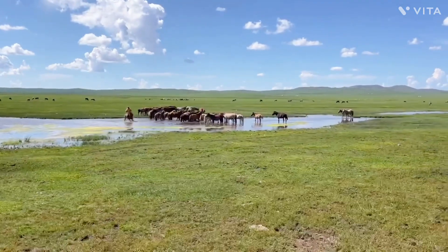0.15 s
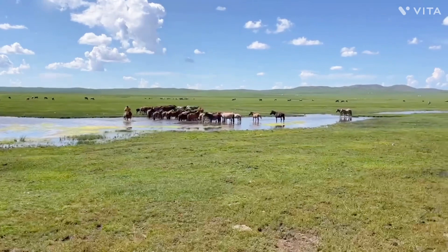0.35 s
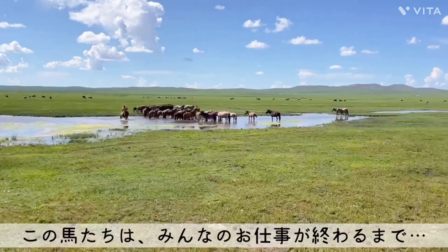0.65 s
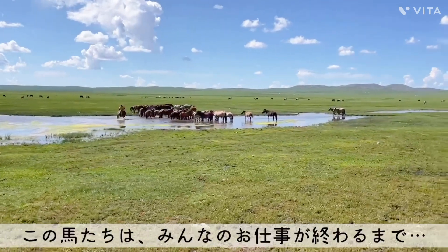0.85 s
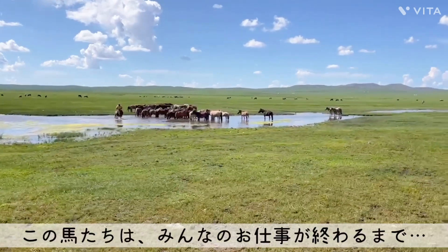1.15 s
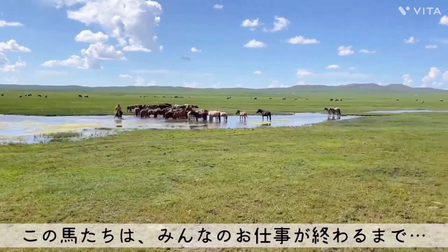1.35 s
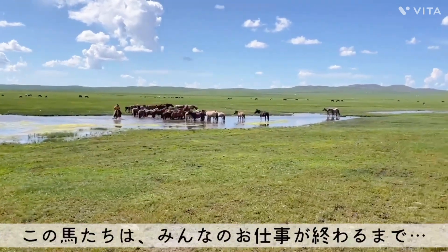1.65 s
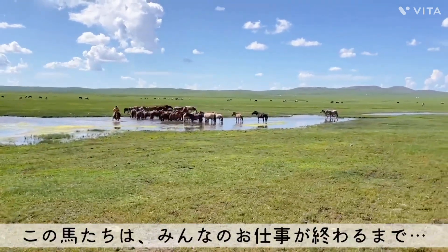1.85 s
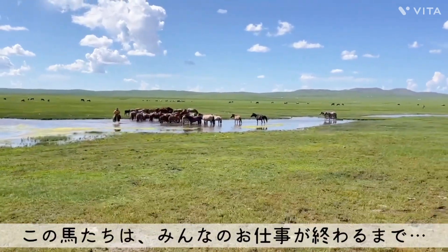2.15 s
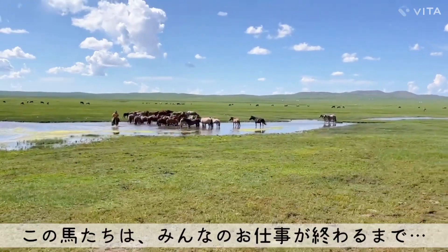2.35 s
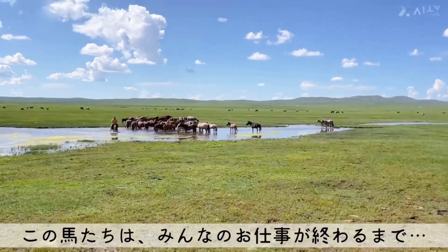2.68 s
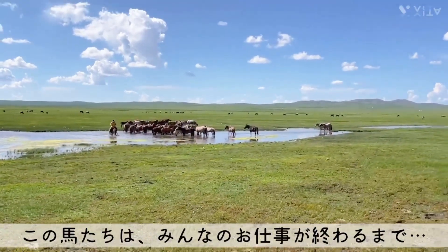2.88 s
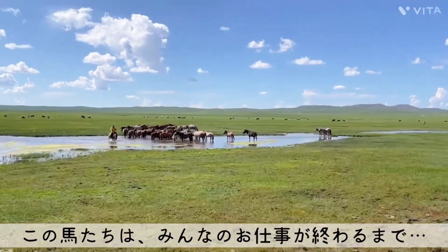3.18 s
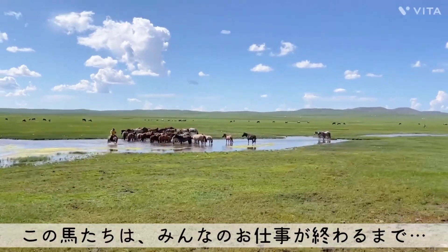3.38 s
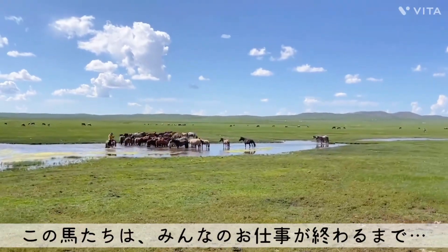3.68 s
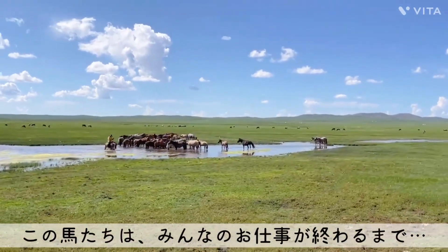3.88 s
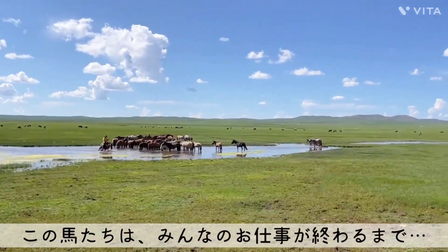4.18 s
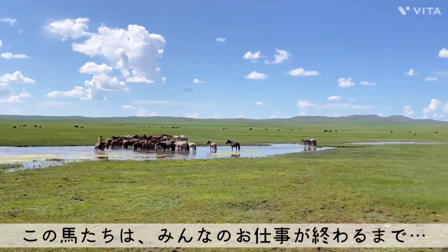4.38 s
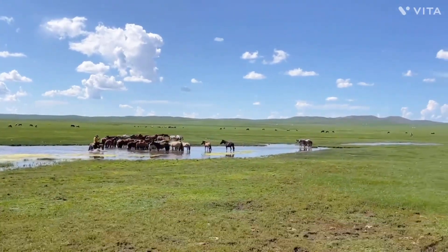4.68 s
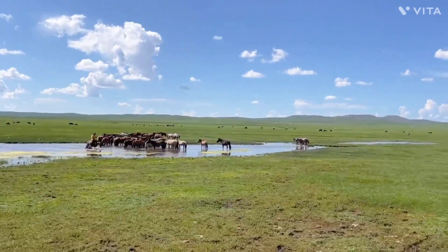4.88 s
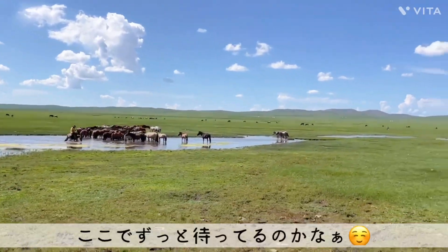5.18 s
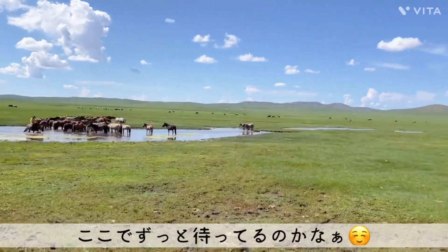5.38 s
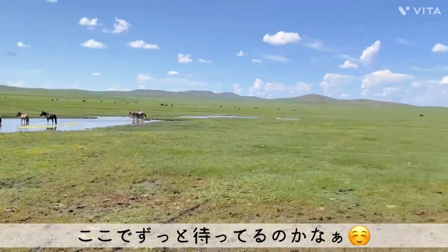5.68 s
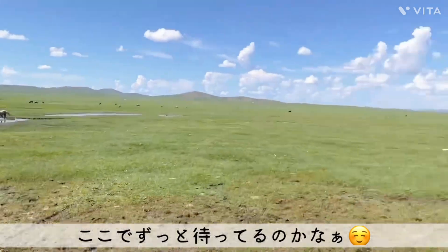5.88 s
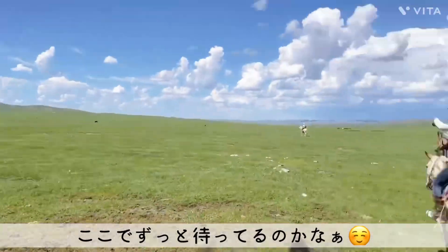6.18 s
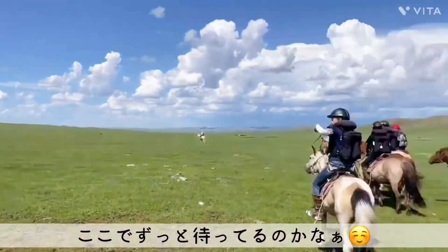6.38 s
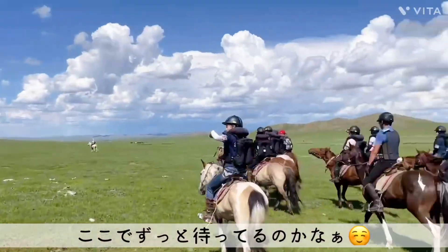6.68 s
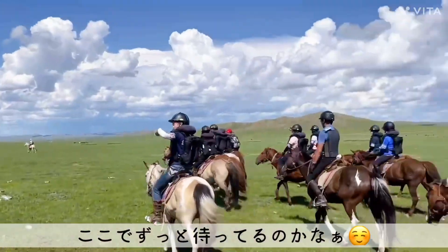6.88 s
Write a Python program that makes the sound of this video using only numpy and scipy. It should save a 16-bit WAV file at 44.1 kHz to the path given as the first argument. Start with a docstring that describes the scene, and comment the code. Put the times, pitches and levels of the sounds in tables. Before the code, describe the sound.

Light wind rumbles on a handheld microphone outdoors as a nearby horse whinnies, its high whistle giving way to low, throaty pulses. A soft snort follows, among faint ticks and dull knocks. Then a second shrill whinny sounds from the left and runs almost straight into a longer third one, both quavering and ending lower and hoarser, while the wind briefly gusts and more soft thuds come.

```python
"""Open steppe: horses whinny near a handheld stereo camera. A whinny has two voices: a high whistle
from the narrowed larynx, with clean overtones, and low pulses of the vocal folds, with breath noise
in the throat and mouth resonances. Light wind buffets the microphone ports, soft thuds and ticks
come from close by, and one horse snorts through fluttering nostrils."""
import sys
import numpy as np
from scipy import signal
from scipy.fft import rfft, irfft, next_fast_len
from scipy.io import wavfile
from scipy.ndimage import uniform_filter1d, map_coordinates

SR = 44100
rng = np.random.default_rng(int(sys.argv[2]) if len(sys.argv) > 2 else 0)


def int16_out(signal):
    """Quantize to a 16-bit WAV file."""
    q = np.round(np.clip(np.atleast_2d(signal).T, -1, 1) * 32767)
    wavfile.write(sys.argv[1], SR, q.astype(np.int16))


N = 310905
T = np.arange(N) / SR

# wind strength: time_s, level_db
WIND_LEVEL = [(0, -48.5), (1.0, -44), (1.45, -41.5), (2.33, -37.5), (2.96, -35.5), (3.14, -35.5),
              (3.165, -43), (3.27, -35.5), (3.47, -49.5), (3.51, -42), (3.66, -52), (3.78, -44),
              (3.89, -38), (4.08, -53.5), (4.14, -44), (4.28, -42), (4.51, -52.5), (4.79, -41), (4.9, -57),
              (5.4, -47), (5.7, -42.5), (5.97, -32), (6.3, -33), (6.7, -45), (7.05, -44)]
# noise spectra: freq_hz, density_db
RUMBLE_SPECTRUM = [(12, -57.5), (20, -27.5), (36, -15), (54, -2), (140, -6), (180, -23), (310, -120)]
FLUTTER_SPECTRUM = [(65, -34.5), (110, -9.5), (183, -4), (302, -4.5), (556, -19.5), (1300, -68.5),
                    (2640, -120)]
HISS_SPECTRUM = [(290, -10), (500, -5.5), (712, -12), (1480, -20.5), (5000, -29.5), (7120, -32.5),
                 (8600, -38), (10900, -76.5), (18500, -120)]
FIZZ_SPECTRUM = [(8000, -32.5), (9000, -2), (11200, -5), (13000, -8), (15500, -25)]
# left-right likeness of the hiss: freq_hz, correlation
HISS_CORRELATION = [(500, -0.31), (3000, 0.31), (7000, -0.099), (8500, -0.99)]
# left-right phase difference; the treble sounds wide and out of phase: freq_hz, phase_rad
STEREO_PHASE = [(100, -.4), (350, -.8), (700, -1.6), (1500, -1.4), (2500, .3), (6000, -1.2), (7200, -1.4),
                (8600, -3.2), (10800, -4.4), (12500, -5.7), (15000, -6.2)]
# dry ticks: start_s, level_db
TICK_HITS = [(0.1785, -46), (0.707, -42.5), (1.21, -44), (1.758, -43), (2.2652, -37.5), (3.158, -38.5),
             (3.674, -39), (4.009, -49.5)]
# soft thuds: start_s, level_db, pitch_hz
THUD_HITS = [(1.122, -16, 296), (2.521, -20.5, 151.6), (2.613, -10.5, 203.6), (2.827, -20, 250),
             (3.114, -19.5, 155), (3.191, -8, 299), (3.258, -19, 247), (3.379, -22, 282),
             (5.793, -10, 186.6), (5.828, -9, 153), (5.87, -7, 260), (5.893, -7, 273.6),
             (5.926, -13.5, 309), (6.085, -11, 165), (6.205, -14.5, 339), (6.296, -11, 257.5),
             (6.454, -14.5, 202)]

# low voice, per phrase: time_s, pitch_hz, chest_db, mouth_over_chest_db, roughness
FOLD_PHRASES = [
    [(0.58, 70.34, -56, 19, 0.4), (0.674, 79.3, -22.5, -3.5, 0.37), (0.736, 70.9, -20, -7.5, 0.66),
     (0.88, 76.3, -35, -14, 0.63)],
    [(1.18, 119.3, -47, 12, 0.23), (1.216, 112.9, -19.5, -4, 0.39), (1.318, 108.2, -19.5, -3, 0.14),
     (1.416, 83.06, -16.5, -8.5, 0.16), (1.65, 85.26, -17, -8, 0.24), (1.74, 89.55, -16.5, -9.5, 0.21),
     (1.79, 95.8, -12.5, -6.5, 0.22), (1.818, 71.75, -15.5, -11.5, 0.29), (2.03, 82.2, -15, -10, 0.35),
     (2.125, 84.9, -15.5, -6.5, 0.28), (2.172, 75.94, -10, -12, 0.19), (2.25, 81.03, -18.5, -9, 0.35),
     (2.356, 67.8, -16, -11, 0.3), (2.48, 58.24, -36.5, -19.5, 0.31)],
    [(5.28, 179.1, -53.5, 13.5, 0.69), (5.41, 177.3, -42, 8, 0.48), (5.43, 175.7, -30.5, -11.5, 0.31),
     (5.596, 161.2, -21, -11, 0.3), (5.71, 273.3, -25, 11.5, 0.28)],
    [(6.59, 189, -36, 10, 0.69), (6.7, 171.1, -37.5, 10, 0.67), (6.76, 141.5, -20.5, 0.5, 0.33),
     (6.85, 150.6, -23.5, -5.5, 0.49), (6.99, 148.6, -22, -1, 0.4), (7.02, 146, -36, -1, 0.36)],
]
# catches of the voice: time_s, dip_db
VOICE_CATCHES = [(1.946, 5), (2.058, 8), (2.151, 7), (2.282, 6.5), (5.48, 7.5), (5.536, 9), (5.575, 9.5),
                 (5.702, 34), (6.743, 2.5)]
# airway resonances: centre_hz, width_hz, gain_db
CHEST_MODES = [(165.8, 60.4, 6.5), (259, 124, 1.5)]
LAST_CHEST_MODES = [(172.6, 66, 1), (274, 92, 2.5)]
THROAT_MODES = [(335, 27, -7.5), (439, 50, -3), (521, 33.6, 0.5), (662, 76, -4), (1004, 93, -10.5),
                (1217, 63, -10)]
FIRST_MOUTH_MODES = [(1140, 336, 6.5), (2022, 100, 2.5), (2316, 110, 1.5), (3040, 200, 1.5),
                     (3390, 170, -1), (4070, 62, -1), (5100, 1100, -17.5)]
LATER_MOUTH_MODES = [(1084.6, 45, -11), (1326.7, 79, 8), (1712.7, 200, 2), (2013, 144, 4), (2348.6, 125, 6),
                     (2899, 810, -4), (3488, 500, -13.5), (5670, 2400, -39)]
NOSE_MODES = [(1010, 300, 25), (1400, 710, -3), (2010, 320, -30)]
# airflow of the first horse, the later calls, the snort: time_s, level_db
FIRST_FLOW = [
    [(0.585, -53), (0.61, -46), (0.8, -39), (0.9, -38), (0.985, -49), (1.15, -60), (1.195, -28),
     (1.37, -49.5), (2.072, -36.5), (2.436, -48), (2.47, -89)],
]
LATER_FLOW = [
    [(4.44, -71), (4.55, -47.5), (4.59, -60), (4.68, -39), (4.73, -43.5), (4.748, -27), (4.775, -50),
     (5.14, -46), (5.335, -42.5), (5.4, -37.5), (5.44, -44.5), (5.5, -42.5), (5.63, -42), (5.688, -24),
     (5.75, -47)],
    [(6.44, -72), (6.572, -31), (6.615, -26), (6.72, -24.5), (6.735, -36.5), (6.76, -32), (6.8, -23),
     (6.84, -36), (6.885, -37), (6.9, -23.5), (6.95, -31), (6.975, -32), (7.0, -28), (7.05, -28)],
]
SNORT_FLOW = [(2.62, -59), (2.754, -36.5), (2.934, -43), (2.97, -92)]
# noise added by each of those flows: hiss_gain_db, fizz_gain_db
FLOW_HISS = [(-2, -17.5), (-11, -31.5), (-7.5, -42)]
# fold slaps in the breath: time_s, power_share
SLAP_SHARE = [(0.5, .25), (2.5, .3), (5.15, .2), (5.6, .15), (5.63, .4), (6.6, .35), (6.75, .75)]
# flutter of the fading breath: time_s, depth_db
BREATH_FLUTTER = [(5.43, 0), (5.46, 6), (5.6, 6), (5.62, 0)]
# flank shakes, about nine a second: time_s, whistle_sag_hz, puff_db
FLANK_SHAKES = [(5.044, 45, -72), (5.179, 225, -29.5), (5.288, 97, -28), (5.365, -1.5, -31),
                (6.103, 28, -44), (6.294, 53, -60), (6.411, 104.5, -43), (6.513, 338, -22.5),
                (6.625, 362, -27), (6.716, 86, -56)]

# whistle, per phrase: time_s, pitch_hz, first_db, second_db, third_db, left_over_right_db
WHISTLE_PHRASES = [
    [(0.83, 949, -34, -49, -43, 10), (0.885, 1180, -44, -29.5, -33.5, 8), (0.918, 1373, -21.5, -31, -43, 8),
     (0.955, 1584, -40, -33, -49, 8), (0.99, 1651, -38, -42.5, -66, 1), (1.035, 1716, -25.5, -39, -58, 4),
     (1.09, 1683, -24.5, -33, -57.5, 1), (1.14, 1652, -24.5, -35, -39.5, 15.5),
     (1.165, 1513, -32, -31.5, -46, 6), (1.185, 1300, -28.5, -35, -46, 24), (1.21, 1021, -54, -53, -67, 9)],
    [(4.745, 1560, -18, -37.5, -39.5, 17), (4.83, 1585, -15.5, -53, -45.5, 18.5),
     (4.915, 1576, -21, -46, -39, 15), (4.94, 1525, -33.5, -27, -35, 11), (5.0, 1556, -36, -48, -37.5, 16),
     (5.045, 1534, -23, -26, -33.5, 12.5), (5.11, 1516, -24.5, -49, -36, 9),
     (5.18, 1479, -28.5, -5.5, -23, 22), (5.23, 1390, -24.5, -40, -45, 14),
     (5.278, 1330, -41, -13.5, -43, 8), (5.31, 1137, -31, -32, -57, 15)],
    [(5.67, 1194, -26, -45.5, -51, -16), (5.71, 1534, -42.5, -32, -55, -4),
     (5.745, 1706, -25, -44.5, -63, -7), (5.82, 1744, -20, -38.5, -48.5, 3.5),
     (5.98, 1788, -20.5, -32.5, -41.5, 3.5), (6.01, 1742, -26, -38.5, -39.5, 3),
     (6.09, 1760, -20, -34, -46, 5), (6.115, 1810, -18.5, -27, -37.5, 6),
     (6.2, 1807, -20.5, -23.5, -40, 13), (6.385, 1858, -20.5, -21.5, -36.5, 12.5),
     (6.405, 1835, -24, -22, -28, 14), (6.48, 1795, -18.5, -20, -39, 11.5),
     (6.555, 1755, -23, -23, -38, 16), (6.59, 1718, -15.5, -26, -36.5, 13), (6.61, 1646, -28, -37, -57, 16),
     (6.685, 1395, -23, -52, -63, 29), (6.74, 1307, -28.5, -62, -75, 15)],
    [(7.008, 1304, -29, -49, -60, 9), (7.025, 1476, -28.5, -45, -71, 26), (7.05, 1494, -28, -29, -68, 27)],
]
# partials 4-9, one row per call: over_third_db
UPPER_PARTIALS = [
    [5, -2, -12, -15, -36, -46],
    [-7.5, -17, -19.5, -22.5, -26, -28],
    [-6.5, -3.5, -2, -17.5, -29, -37.5],
]
# partials 1-3, one row per call: left_right_phase_rad
PARTIAL_PHASE = [
    [-2.5, .3, .6],
    [-1.7, 2.2, .9],
    [0, .5, 0],
]
# partials 1-9: share_of_pan
PARTIAL_PAN = [1, 0.63, 0.58, 0.36, 0.011, 0, 0.14, 0.043, 0]
# partials 1-3: loss_db_per_100_hz_of_sag
SAG_LOSS = [1.5, 4.5, 9]
# partials 1, 2, the rest: flicker_db
PARTIAL_FLICKER = [2.04, 2.5, 2]
# overtone dropouts: db_per_hz_per_s_of_glide, db_per_hz_of_sag
DROPOUT_DEPTH = [.0018, .022]

BUFFET_DB, FLUTTER_DB, FLUTTER_SWING = 5.5, 2.5, 0.94  # relative to the wind level
FAR_HISS_DB, FIZZ_DB = -47.5, -66
CATCH_HALF_WIDTH_S, CATCH_SAG_PER_DB, BREATH_CATCH_SHARE = 0.021, .012, 0.38
NASAL_DIP_HZ, MOUTH_DELAY_S, MOUTH_SWELL_DB = 782, 0.003812, 3.5
JITTER, JITTER_PER_HZ_PER_S, JITTER_PER_HZ = .003, 1.1e-6, 3e-5  # held, gliding, sagging
GLIDE_LOSS_DB_PER_HZ_PER_S = .004
SHAKE_IN_S, SHAKE_OUT_S = .022, .028
BAND_LIMIT_HZ = 15550


def amp(db):
    return 10 ** (np.asarray(db) / 20)


def unit_rms(x):
    return x / np.sqrt(np.mean(x ** 2) + 1e-20)


def log_interp(points, hz):
    """Interpolate (freq_hz, value) points on a log axis."""
    freq_hz, values = np.transpose(points)
    return np.interp(np.log(hz + 1), np.log(freq_hz + 1), values)


def tracks(phrases, edge_s=.006):
    """A gate open during the phrases, then one smooth curve per column."""
    gate = sum(((T >= rows[0][0]) & (T < rows[-1][0])) * 1. for rows in phrases)
    time_s, *columns = np.concatenate(phrases).T
    curves = [np.minimum(gate, 1)] + [np.interp(T, time_s, column) for column in columns]
    return [uniform_filter1d(curve, int(edge_s * SR) + 1) for curve in curves]


def wobble(rate_hz):
    """Smooth curve through random knots."""
    return map_coordinates(rng.standard_normal(int(N * rate_hz / SR) + 4), [T * rate_hz])


def flicker(depth_db, rate_hz):
    return amp(depth_db * wobble(rate_hz))


def filtered(x, response):
    """Apply a complex frequency response."""
    size = next_fast_len(N + SR // 2)
    return irfft(rfft(x, size) * response(np.fft.rfftfreq(size, 1 / SR)), size)[..., :N]


def resonances(modes, f):
    """Summed band-pass responses of alternating sign."""
    return sum((-1) ** k * amp(db) * 1j * f * width_hz / (hz * hz - f * f + 1j * f * width_hz)
               for k, (hz, width_hz, db) in enumerate(modes))


def left_right(difference):
    return np.outer([.5, -.5], difference)


def to_stereo(x, pan_db):
    """Spread one source to left and right, apart in phase and level."""
    pair = filtered(x, lambda hz: np.exp(1j * left_right(log_interp(STEREO_PHASE, hz))))
    return pair * amp(left_right(pan_db))


def stereo_noise(spectrum, correlation, patchy_db):
    """Noise of rms 1 with time-frequency patches of random gain."""
    bins = signal.stft(rng.standard_normal((2, N)), nperseg=512)[2]
    patches = uniform_filter1d(uniform_filter1d(rng.standard_normal(bins.shape[1:]), 6, 0), 8, 1)
    pair = signal.istft(bins * amp(patchy_db * unit_rms(patches)), nperseg=512)[1][:, :N]
    angle = lambda hz: np.arccos(np.clip(log_interp(correlation, hz), -1, 1)) / 2
    response = lambda hz: amp(log_interp(spectrum, hz)) * [np.cos(angle(hz)), np.sin(angle(hz))]
    mid, side = filtered(pair, response)
    return unit_rms(np.array([mid + side, mid - side]))


def wind(flows):
    """Gusts buffet and flutter at the ports; a far hiss and fizz swell with the horses' breath."""
    wind_db = tracks([WIND_LEVEL])[1]
    gusts = flicker(4.57, 24)
    buffet = flicker(1.0, 13) * stereo_noise(RUMBLE_SPECTRUM, [(30, 0.72), (100, 0.46)], patchy_db=0.5)
    buffet = amp(wind_db + BUFFET_DB) * unit_rms(gusts * buffet)
    flutter_db = wind_db.mean() + FLUTTER_DB + FLUTTER_SWING * (wind_db - wind_db.mean())
    flutter = flicker(4, 40) * stereo_noise(FLUTTER_SPECTRUM, [(200, .8)], patchy_db=2)
    flutter = amp(flutter_db) * unit_rms(gusts * flutter)
    hiss_gain, fizz_gain = amp([[FAR_HISS_DB], [FIZZ_DB]]) + amp(FLOW_HISS).T @ flows
    hiss = flicker(1, 23) * stereo_noise(HISS_SPECTRUM, HISS_CORRELATION, patchy_db=2.8)
    fizz_correlation = [(9300, -1.06), (10800, -0.5), (12500, 1.0), (14000, 1.0)]
    fizz = flicker(1.6, 86) * stereo_noise(FIZZ_SPECTRUM, fizz_correlation, patchy_db=5.5)
    return buffet + flutter + hiss_gain * hiss + fizz_gain * unit_rms(fizz)


def strikes(hits, attack_s, t60_s, wave):
    """Fast-decaying bursts of wave(t, *remaining columns), one per hit."""
    out, t = np.zeros(N + SR), np.arange(SR // 10) / SR
    for start_s, db, *rest in hits:
        envelope = amp(db - 60 * t / t60_s) * (1 - np.exp(-t / attack_s))
        out[round(start_s * SR):][:len(t)] += envelope * wave(t, *rest)
    return out[:N]


def ticks():
    """Dry noise bursts through two treble resonances."""
    bursts = strikes(TICK_HITS, attack_s=0.0013, t60_s=0.038, wave=lambda t: rng.standard_normal(len(t)))
    return filtered(bursts, lambda f: resonances([(5300, 840, 8.1), (12500, 860, 11)], f))


def vocal_folds(catch_db):
    """Low voice and its cycle count; roughness scatters the pulses and adds puffs of noise."""
    gate, hz, chest_db, mouth_db, rough = tracks(FOLD_PHRASES)
    rough = np.clip(rough, 0, 1)
    hz = hz * (1 - CATCH_SAG_PER_DB * catch_db)
    cycles = np.cumsum(hz * (1 + .008 * wobble(14) + .17 * rough * wobble(70))) / SR
    pulses = np.diff(np.floor(cycles), prepend=0) * flicker(3.5 * rough, 80) / np.sqrt(hz)
    puffs = np.exp(-2 * (cycles % 1)) * rng.standard_normal(N)
    mix = lambda share: np.sqrt(1 - share) * unit_rms(pulses) + np.sqrt(share) * unit_rms(puffs)
    pulsed, airy = mix(rough / 2), mix(np.clip(1.7 * rough - .12, 0, 1))
    # the chest is dark and passes little of the fundamental
    skirt = lambda f: 1j * f / (130 + 1j * f) * 1j * f / (90 + 1j * f) / (1 + 1j * f / 400) ** 2
    chests = [unit_rms(filtered(pulsed, lambda f: resonances(modes, f) * skirt(f)))
              for modes in (CHEST_MODES, LAST_CHEST_MODES)]
    chest = np.where(T < 6, *chests)
    notch = lambda f: 1 - 0.63 * resonances([(NASAL_DIP_HZ, 200, 0)], f)
    mouth = filtered(airy, lambda f: resonances(THROAT_MODES, f) * notch(f) / (1 + 1j * f / 1500) ** 2)
    mouth = np.roll(unit_rms(mouth), int(MOUTH_DELAY_S * SR))
    return gate * amp(chest_db) * (chest + amp(mouth_db) * mouth), cycles


def airflow(shakes):
    """Flow amplitudes: first horse, later calls with a puff per shake, snort."""
    curves = (tracks(phrases, edge_s=0.013) for phrases in (FIRST_FLOW, LATER_FLOW, [SNORT_FLOW]))
    first, later, nasal = [gate * amp(db) for gate, db in curves]
    puffs = amp(np.transpose(FLANK_SHAKES)[2]) @ shakes
    return np.array([first, later + puffs, nasal])


def breath(cycles, flows):
    """Turbulent air and uneven fold slaps ring mouth resonances that each swell and fade."""
    gate, depth_db = tracks([BREATH_FLUTTER])
    flutter = amp(gate * depth_db * np.cos(2 * np.pi * 48 * T + wobble(30)))
    puffs = (.4 + np.exp(-3.5 * (cycles % 1))) * flutter
    share = tracks([SLAP_SHARE])[1]
    closures = np.diff(np.floor(cycles), prepend=0)
    slaps = closures * amp(3 * rng.standard_normal(N)) / np.sqrt(np.gradient(cycles))
    turbulence = unit_rms(puffs * rng.standard_normal(N))
    source = np.sqrt(1 - share) * turbulence + np.sqrt(share) * unit_rms(slaps)
    source = filtered(source, lambda f: 1 / (1 + 1j * f / 4500) ** 3)
    knots_s = np.arange(0, N / SR + .04, .04)
    out = 0
    for flow, modes in zip(flows, (FIRST_MOUTH_MODES, LATER_MOUTH_MODES)):
        air = 0
        for hz, width_hz, db in modes:
            ring = signal.iirpeak(hz, hz / width_hz, SR)
            swell_db = np.interp(T, knots_s, rng.normal(0, MOUTH_SWELL_DB, len(knots_s)))
            air = air + amp(db + swell_db) * signal.lfilter(*ring, signal.lfilter(*ring, source))
        out = out + flow * unit_rms(air)
    return out


def whistle(shakes):
    """Air through the narrowed larynx: nine partials, grainy in glides, rasping in sags."""
    gate, hz, first_db, second_db, third_db, pan_db = tracks(WHISTLE_PHRASES)
    sag_hz = np.transpose(FLANK_SHAKES)[1] @ shakes
    hz = uniform_filter1d(hz, int(.015 * SR)) - sag_hz
    glide_hz_per_s = uniform_filter1d(np.abs(np.gradient(hz)) * SR, int(.06 * SR))
    jitter = (JITTER + JITTER_PER_HZ_PER_S * glide_hz_per_s + JITTER_PER_HZ * sag_hz) * wobble(350)
    phase = 2 * np.pi * np.cumsum(hz * (1 + .003 * wobble(70) + jitter)) / SR
    crackle_db = DROPOUT_DEPTH[0] * np.maximum(glide_hz_per_s - 1500, 0)
    hoarse_db = np.minimum(crackle_db + DROPOUT_DEPTH[1] * np.abs(sag_hz), 7)
    dropouts_db = hoarse_db * np.abs([wobble(90), wobble(90)])
    call = np.searchsorted([3, 5.5], T)  # call index, split at 3 s and 5.5 s
    lower_db = [first_db, second_db, third_db] - np.outer(SAG_LOSS, sag_hz / 100)
    glide_loss_db = GLIDE_LOSS_DB_PER_HZ_PER_S * glide_hz_per_s
    upper_db = lower_db[2] - glide_loss_db + np.transpose(UPPER_PARTIALS)[:, call]
    spread_rad = list(np.transpose(PARTIAL_PHASE)[:, call])
    spread_rad += [log_interp(STEREO_PHASE, k * hz) for k in range(4, 10)]
    out = 0
    for k, db in enumerate([*lower_db, *upper_db]):
        balance = amp(left_right(PARTIAL_PAN[k] * pan_db))
        flicker_db = PARTIAL_FLICKER[min(k, 2)] * wobble(40) + 0.92 * k * wobble(200)
        gain = amp(db + flicker_db - np.sqrt(k) * dropouts_db[k % 2])
        out = out + gain * balance / balance.mean(0) * np.sin((k + 1) * phase + left_right(spread_rad[k]))
    return np.sqrt(2) * gate * out


def thuds():
    """Soft knocks: a few low cycles with a faint inharmonic overtone."""
    tone = lambda t, hz: np.sin(2 * np.pi * hz * t) + 0.059 * np.sin(2 * np.pi * 2.3 * hz * t)
    return strikes(THUD_HITS, attack_s=0.0031, t60_s=0.046, wave=tone)


def voice_catches():
    """Brief holds of the voice, as a dip in dB."""
    return sum(db * np.exp(-((T - time_s) / CATCH_HALF_WIDTH_S) ** 2) for time_s, db in VOICE_CATCHES)


def snort(flow):
    """Fluttering nostrils chop the air that rings the nose resonances."""
    flap = amp(9 * np.cos(2 * np.pi * 22.5 * (T - 2.795)))
    gain = flow * flicker(2, 45)
    air = filtered(flap * rng.standard_normal(N), lambda f: resonances(NOSE_MODES, f) ** 2)
    return gain * unit_rms(air)


def flank_shakes():
    """One envelope per shake: quick in, slower out, peak 1."""
    since_s = T - np.transpose(FLANK_SHAKES)[0][:, None]
    return np.exp(-(since_s / np.where(since_s < 0, SHAKE_IN_S, SHAKE_OUT_S)) ** 2)


def scene():
    """Horses, knocks and wind in stereo."""
    shakes, catch_db = flank_shakes(), voice_catches()
    flows = airflow(shakes)
    voice, cycles = vocal_folds(catch_db)
    air = breath(cycles, flows[:2]) + snort(flows[2])
    voice_and_air = amp(-catch_db) * voice + amp(-BREATH_CATCH_SHARE * catch_db) * air
    # the camera turns, and the later caller stands further left
    pan_db = np.interp(T, [2.5, 5.2, 6.6], [2.5, 4, 6])
    horses = whistle(shakes) + to_stereo(voice_and_air, pan_db)
    return horses + to_stereo(ticks() + thuds(), pan_db=[1]) + wind(flows * amp(-catch_db))


def record(dry):
    """The camera keeps nothing above its band limit."""
    return filtered(dry, lambda hz: hz < BAND_LIMIT_HZ)


dry = scene()
out = record(dry)
int16_out(out)
```